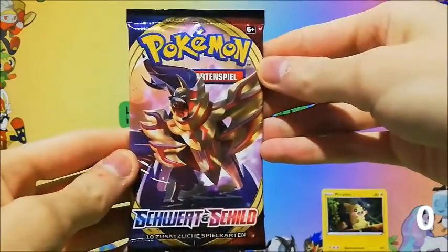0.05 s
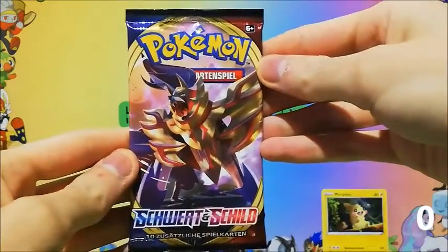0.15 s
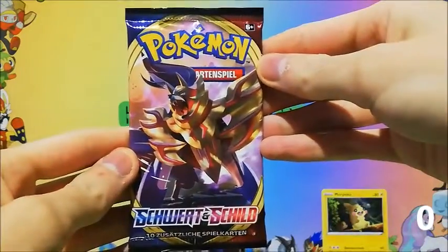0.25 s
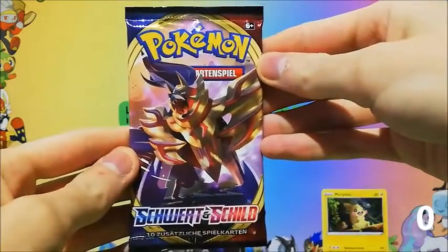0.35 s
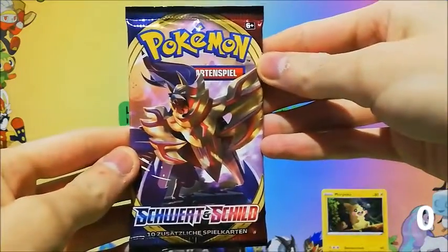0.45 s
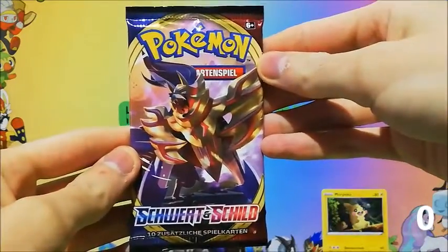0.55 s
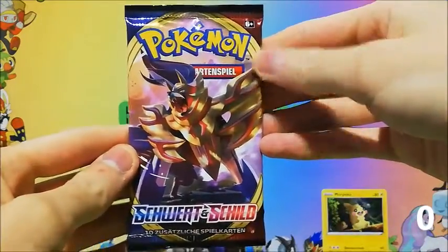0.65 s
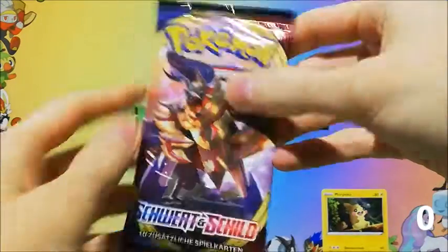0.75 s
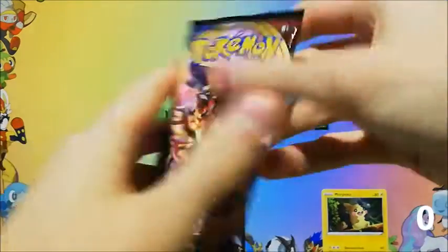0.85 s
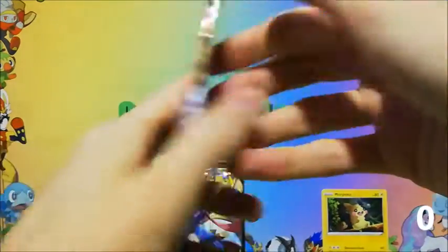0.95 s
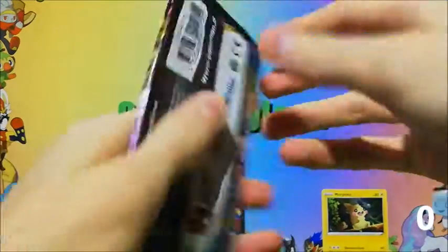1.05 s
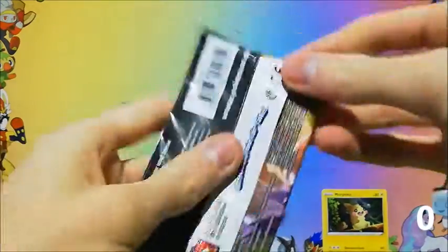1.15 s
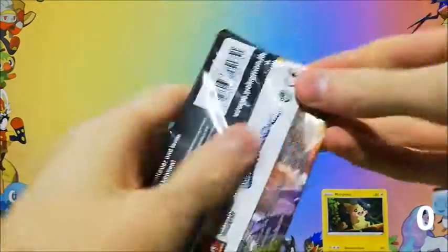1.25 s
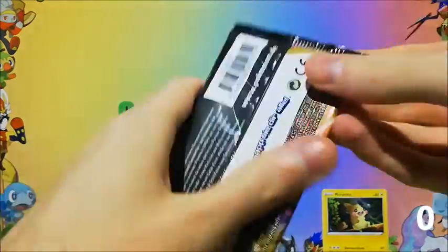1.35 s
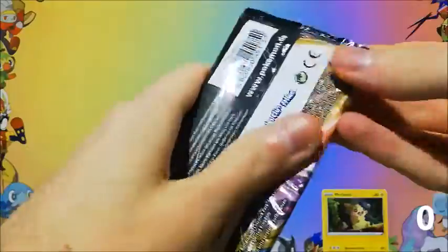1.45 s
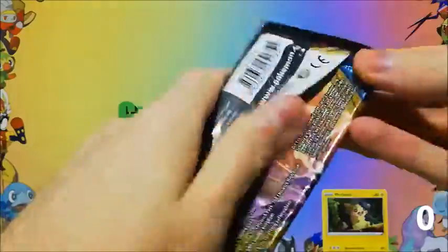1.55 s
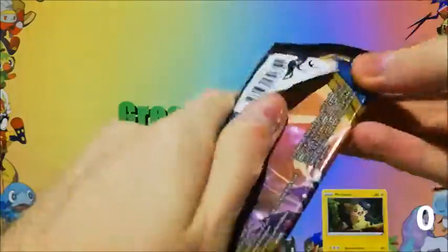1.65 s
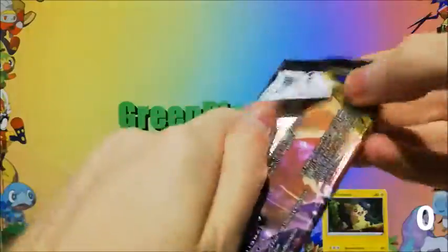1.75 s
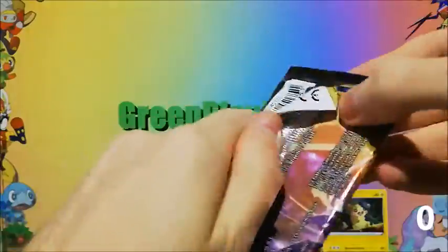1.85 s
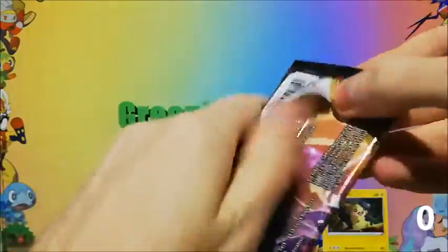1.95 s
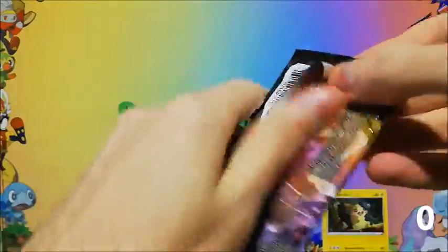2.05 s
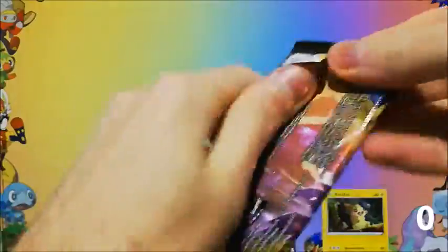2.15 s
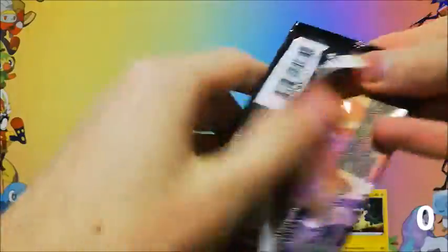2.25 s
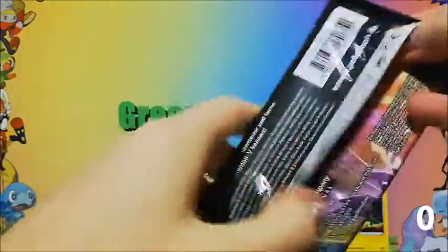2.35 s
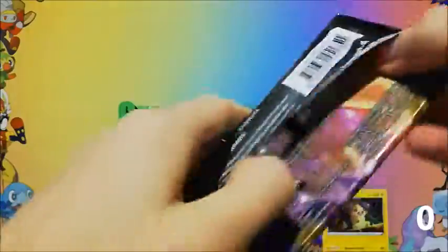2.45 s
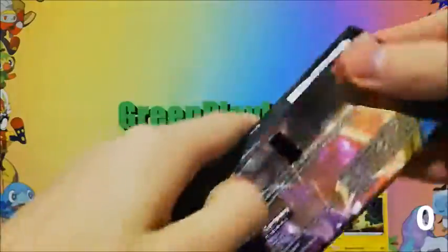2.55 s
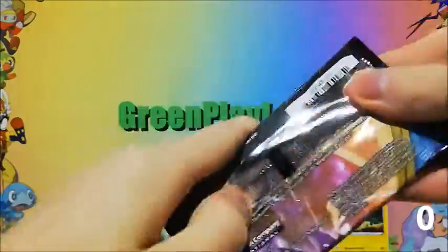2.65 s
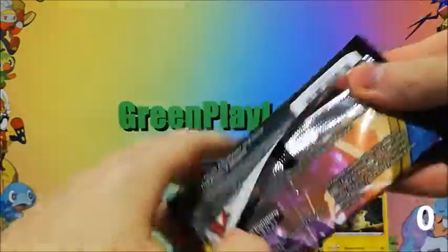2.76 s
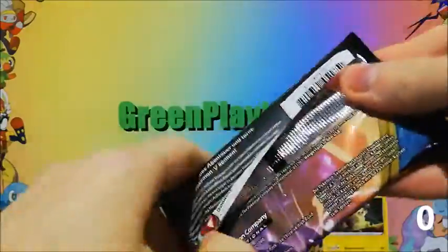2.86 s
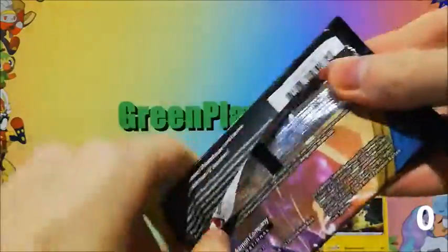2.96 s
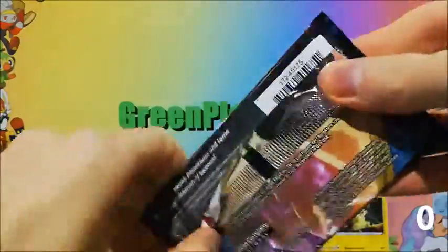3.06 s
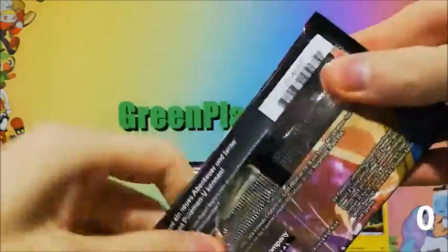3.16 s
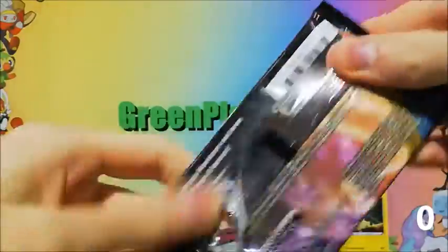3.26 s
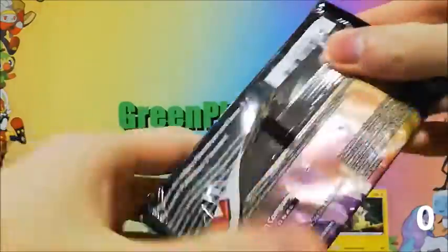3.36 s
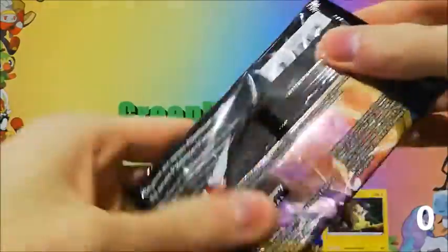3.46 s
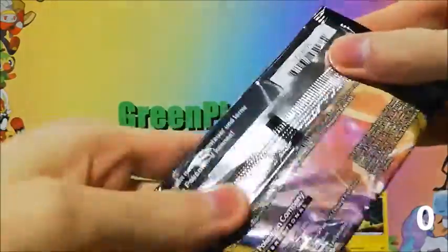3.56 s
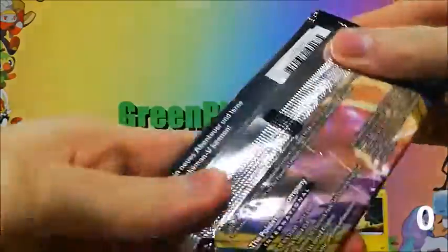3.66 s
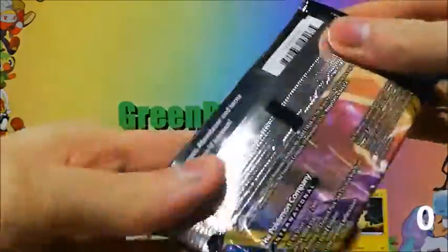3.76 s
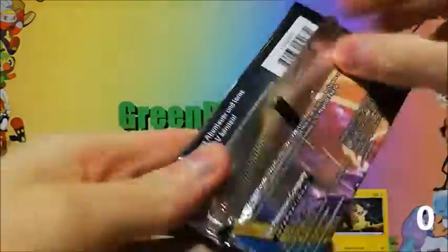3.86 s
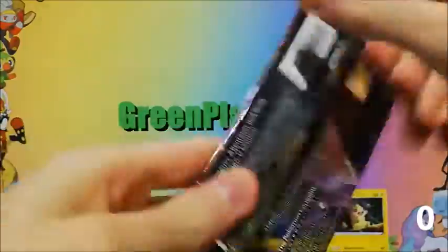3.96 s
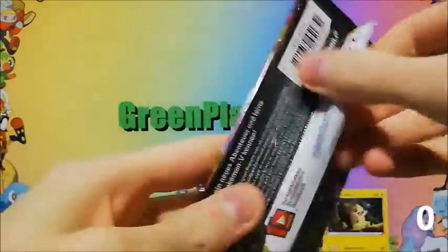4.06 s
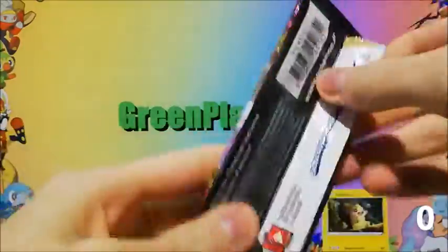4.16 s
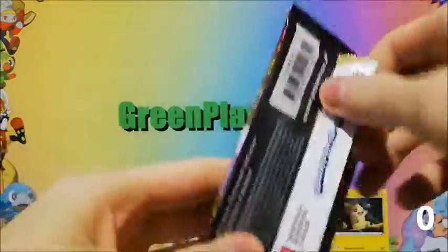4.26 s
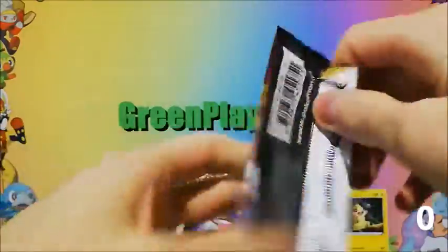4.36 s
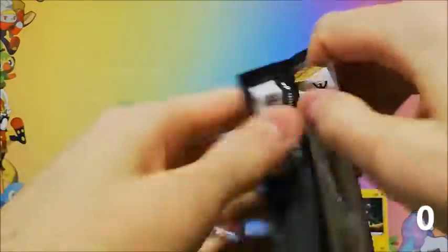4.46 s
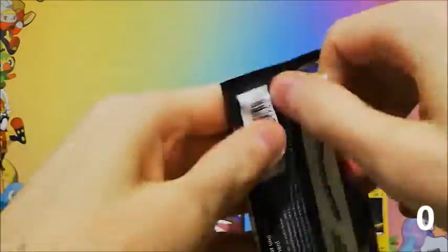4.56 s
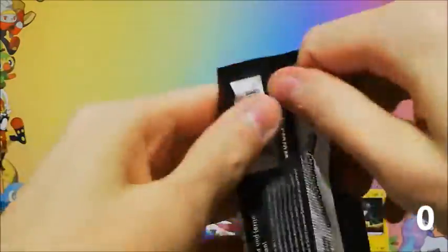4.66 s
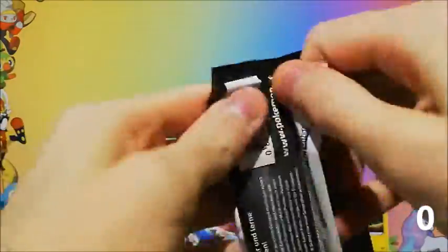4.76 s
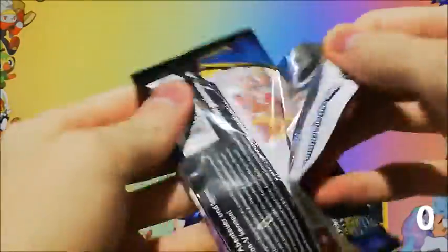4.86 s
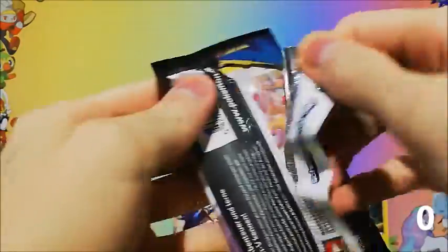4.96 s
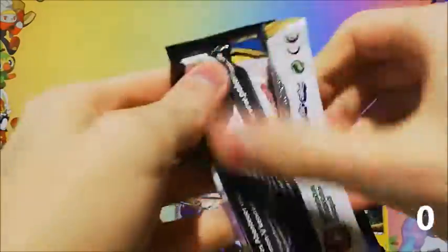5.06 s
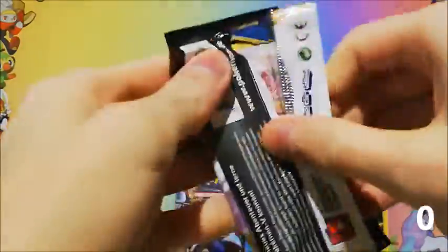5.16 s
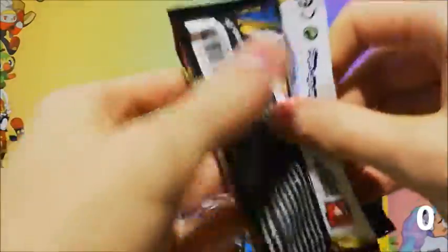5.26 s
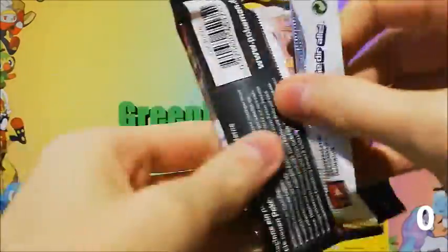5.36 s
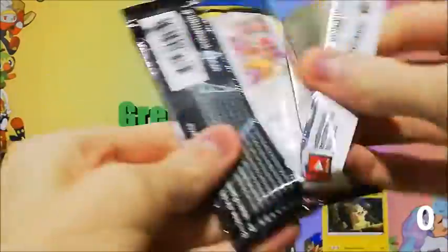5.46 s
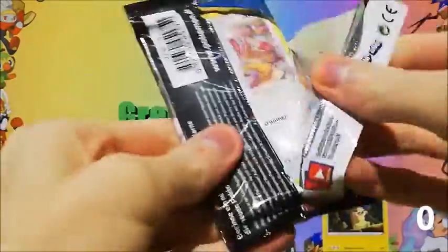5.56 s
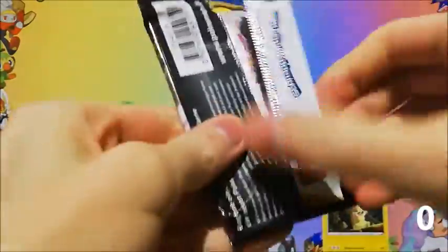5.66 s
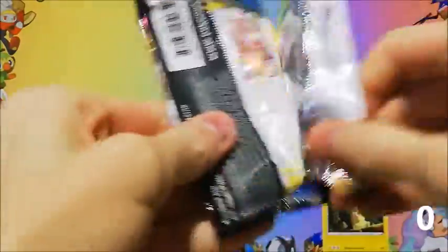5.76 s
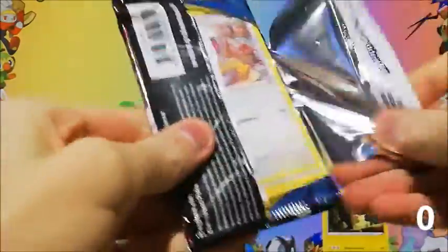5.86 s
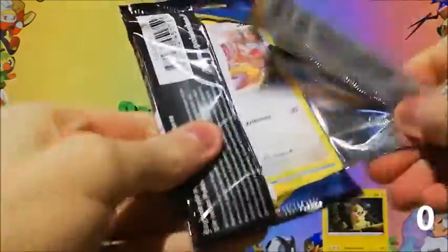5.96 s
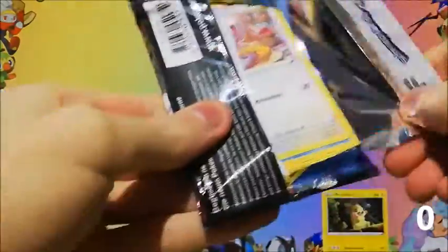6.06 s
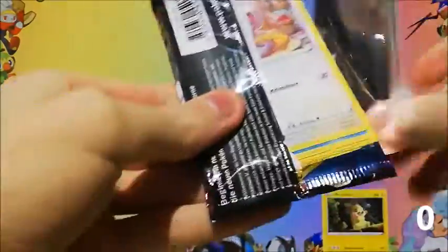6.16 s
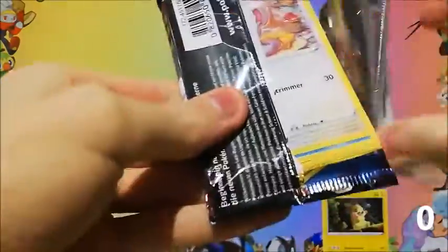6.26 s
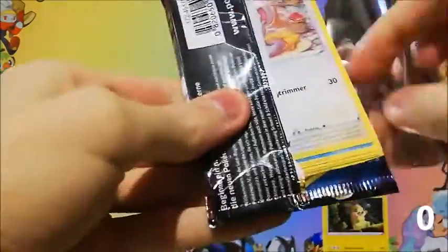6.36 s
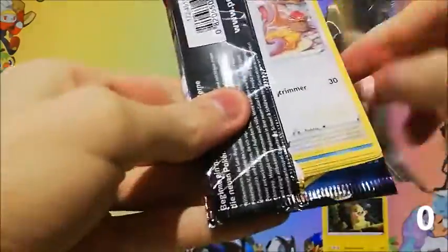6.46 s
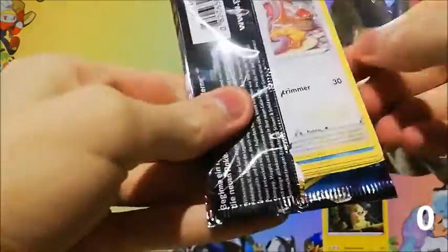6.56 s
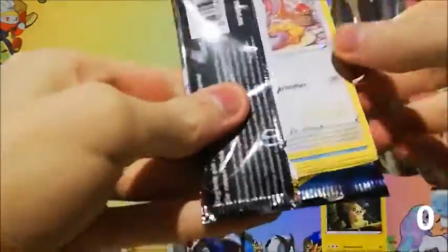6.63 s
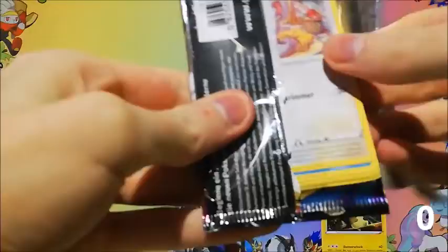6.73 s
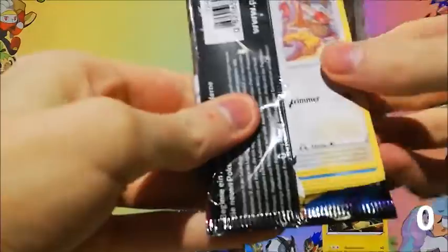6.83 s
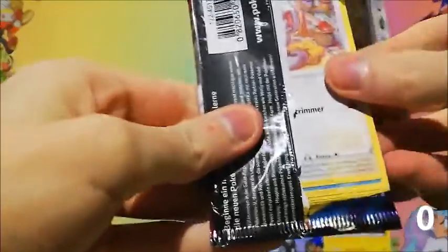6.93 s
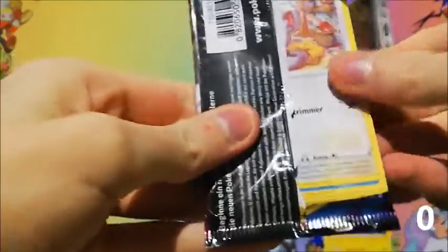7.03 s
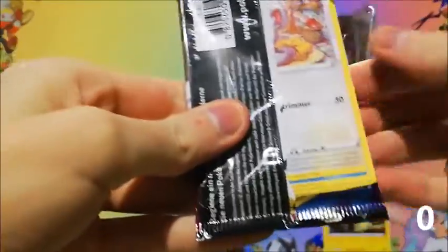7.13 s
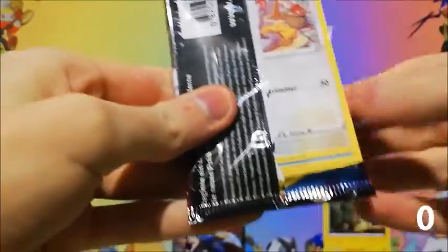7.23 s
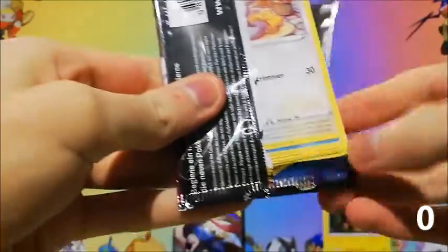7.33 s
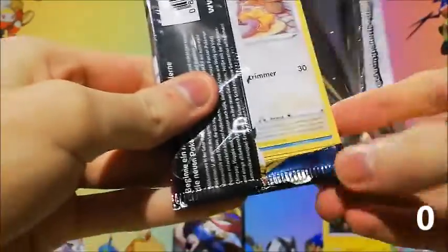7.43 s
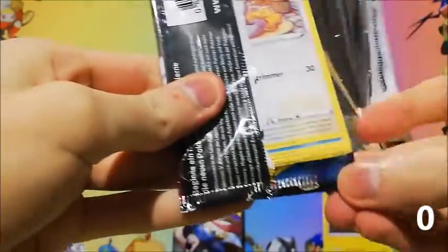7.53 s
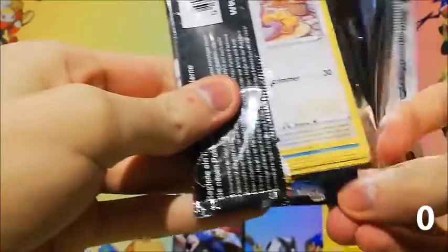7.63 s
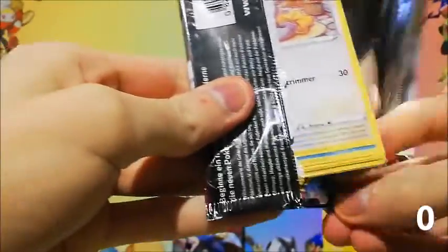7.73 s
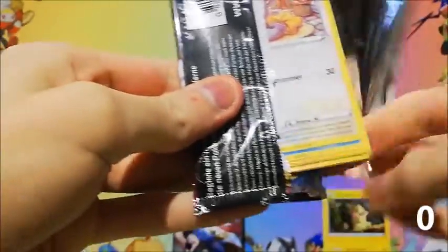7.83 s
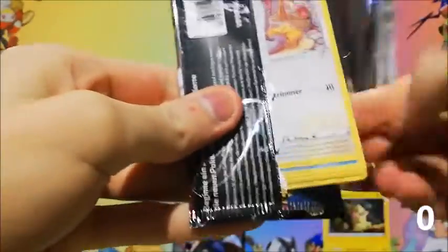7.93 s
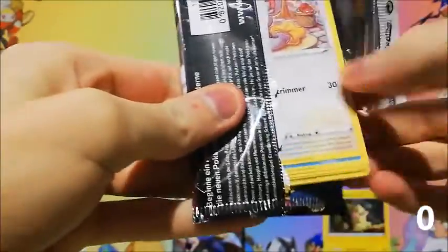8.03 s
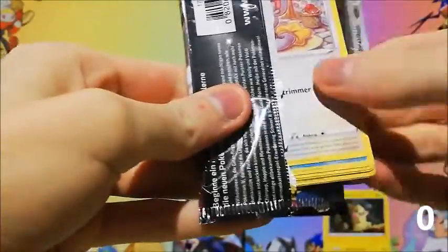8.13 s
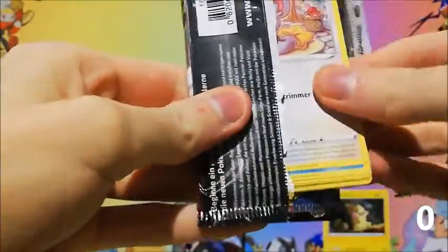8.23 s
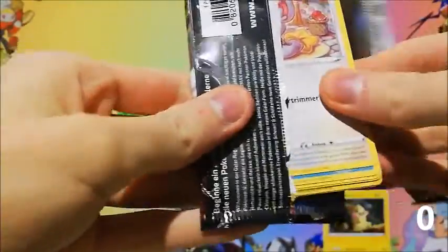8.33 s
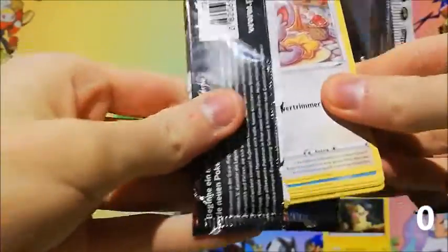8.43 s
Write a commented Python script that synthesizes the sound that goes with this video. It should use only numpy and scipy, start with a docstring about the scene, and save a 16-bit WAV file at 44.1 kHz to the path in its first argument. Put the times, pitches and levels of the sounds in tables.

```python
"""A foil trading-card wrapper is turned over, peeled open along its glued seam and folded back, close by.
Creases snap through and ring the stiff facets as short-lived modes; the seam lets go by stick-slip.
Squeezed foil crackles in many tiny pops and, where it slides instead of buckling, hisses softly.
Fingertips bump the stack of cards inside, a set of damped modes, and slide on it; one card ticks softly.
A small room adds brief echoes and a steady hush; two microphone ports colour the sound."""
import sys
import numpy as np
from scipy import signal
from scipy.fft import rfft, irfft, next_fast_len
from scipy.io import wavfile

SR = 44100
rng = np.random.default_rng(int(sys.argv[2]) if len(sys.argv) > 2 else 0)


def store_wav(level_fs):
    """Save 16-bit WAV to argv[1]."""
    pcm = np.round(np.clip(np.atleast_2d(level_fs), -1, 1) * 32767)
    wavfile.write(sys.argv[1], SR, pcm.T.astype(np.int16))


N = 374409
TIME = np.arange(N) / SR


def from_db(db):
    """Level to amplitude: 20 dB is a factor of ten."""
    return 10 ** (np.asarray(db) / 20)


def unit(x):
    """Energy normalisation: the mean energy of two channels becomes one."""
    return x / np.sqrt(np.sum(x ** 2) / 2 + 1e-20)


def at_hz(points, hz):
    """Spectral interpolation: straight lines on a log-frequency axis."""
    points = np.array(points)
    return np.interp(np.log(hz + 1e-9), np.log(points[:, 0]), points[:, 1])


def at_time(rows, s):
    """Linear interpolation in time of every column of a curve."""
    times, *columns = np.transpose(rows)
    return [np.interp(s, times, c) for c in columns]


def add(out, s, sound):
    """Superposition: mix a stereo sound in from time s on."""
    i = int(np.clip(s * SR, 0, N))
    out[:, i:i + sound.shape[1]] += sound[:, :N - i]


def noise(spectrum, likeness, size):
    """Partial coherence: shared and opposed noise make a stereo sound of rms one with a set likeness."""
    hz = np.fft.rfftfreq(size, 1 / SR)
    alike = np.clip(at_hz(likeness, hz), -1, 1)
    mid, side = rfft(rng.standard_normal((2, size))) * from_db(at_hz(spectrum, hz))
    stereo = np.sqrt(1 + alike) * mid + np.sqrt(1 - alike) * side * [[1], [-1]]
    return unit(irfft(stereo, size)) * np.sqrt(size)


def effort(t, length, attack_s, release_s):
    """Trapezoidal envelope, 0-1: a hand movement tightens, holds and lets go."""
    return np.clip(t / attack_s, 0, 1) * np.clip(1 - (t - length) / release_s, 0, 1)


# spectrum of the room's steady background: f/Hz, relative density/dB per Hz
HUSH_SPECTRUM = [(25, -4.5), (60, -11), (140, -8.5), (250, -13), (600, -23), (1300, -17.5), (2600, -22),
                 (10000, -25.5), (16000, -35)]
# left-right likeness of diffuse noise: f/Hz, likeness (0-1)
DIFFUSE_LIKENESS = [(100, 0.76), (1000, 0.24), (6000, 0.055)]
HUSH_DB = -65


def hush():
    """Stationary noise: the room's background has a fixed spectrum and level."""
    return from_db(HUSH_DB) * noise(HUSH_SPECTRUM, DIFFUSE_LIKENESS, size=next_fast_len(N))[:, :N]


# strength of the room's echo: f/Hz, level/dB
ECHO_SPECTRUM = [(100, -16), (450, 0), (1500, -5.5), (4000, -9.5), (10000, -11.5), (16000, -10.5)]
ROOM_T60_S = 0.32


def room(x, first_s=0.00087, build_s=0.0051):
    """Reverberation: echoes from desk and walls thicken within milliseconds and decay exponentially."""
    t = TIME[:SR // 2]
    build_up = np.clip((t - first_s) / build_s, 0, 1)
    tail = unit(rng.standard_normal((2, len(t))) * from_db(-60 * t / ROOM_T60_S) * build_up)
    colour = from_db(at_hz(ECHO_SPECTRUM, np.fft.rfftfreq(len(t), 1 / SR)))
    tail = irfft(rfft(tail) * colour, len(t))
    return x + signal.oaconvolve(x, tail, axes=1)[:, :N]


# resonances and dips of the two microphone ports: f/Hz, width/Hz, left level/dB, right level/dB
PORT_RESONANCES = [(1960, 330, -2, 2), (4100, 3000, -1.5, 2), (5830, 330, -1.5, -0.5),
                   (10020, 1980, 6, 5.5), (11900, 3500, -.5, 4)]


def ports(x):
    """Cavity resonance: small microphone openings colour each side a little differently."""
    left, right = x
    for hz, width_hz, left_db, right_db in PORT_RESONANCES:
        b, a = signal.iirpeak(hz, hz / width_hz, fs=SR)
        left = left + (from_db(left_db) - 1) * signal.lfilter(b, a, left)
        right = right + (from_db(right_db) - 1) * signal.lfilter(b, a, right)
    return np.array([left, right])


# the pack moves from the left towards the middle: t/s, left minus right level/dB, right ear's delay/ms
PACK_POSITION = [(5.7, 1.5, .1), (6.1, 1.3, .035)]


def placed(x):
    """Interaural differences: a sound to the left reaches the right ear later and weaker."""
    left_db, delay_ms = at_time(PACK_POSITION, TIME)
    delay = np.round(delay_ms * SR / 1000).astype(int)  # whole samples
    earlier = np.clip(np.arange(N) - delay, 0, N - 1)
    return np.array([x[0] * from_db(left_db / 2), x[1, earlier] * from_db(-left_db / 2)])


# fingertips bumping the cards: t/s, relative knock level/dB, relative thud level/dB
CARD_BUMPS = [(.848, -51, -62), (1.409, -48.5, -77), (2.385, -47.5, -74), (3.37, -47, -74),
              (4.086, -54, -50), (4.18, -54.5, -68), (5.098, -48.5, -54.5), (5.936, -46, -52),
              (5.993, -42.5, -62), (6.088, -48, -64), (6.128, -51.5, -68), (6.307, -48.5, -58),
              (6.487, -50.5, -62), (6.62, -51.5, -53.5), (6.898, -57, -77), (7.222, -52.5, -68),
              (7.881, -41, -60), (8.134, -54, -74)]
# modes of the stack of cards in the hand: median f/Hz, relative level/dB, t60/s
STACK_MODES = [(160, -3.5, 0.046), (229, -1, 0.046), (301.5, 1, 0.041), (400, -2.5, 0.041),
               (605, -5.5, 0.027)]


def bumps(knock_db=9.5, thud_db=10.5, thud_hz=75, thud_t60=0.073):
    """Modal excitation: a bump rings the stack of cards and shakes the hand with a thud."""
    out, t = np.zeros((2, N)), TIME[:SR // 5]
    soft_contact = 1 - np.exp(-t / .003)
    for s, knock, thud in CARD_BUMPS:
        bump = from_db(thud + thud_db - 60 * t / thud_t60) * np.sin(2 * np.pi * thud_hz * t)
        for hz, level, t60 in STACK_MODES:
            # the grip changes, so the modes shift from bump to bump
            held_hz = hz * np.exp(.08 * rng.standard_normal())
            fading = from_db(knock + knock_db + level - 60 * t / t60)
            bump += fading * np.sin(2 * np.pi * (held_hz * t + rng.random()))
        add(out, s, np.array([bump, bump]) * soft_contact)
    return out


# a fingertip sliding on the pack: middle t/s, half length to 1/e /s,
# relative scrape level/dB, relative low rub level/dB
FINGER_SLIDES = [(0.897, .05, -57, -65.5), (6.253, .09, -59, -53.5), (6.806, 0.025, -41, -70),
                 (7.936, 0.048, -54, -59.5)]
# a fingertip scraping on card: f/Hz, relative density/dB per Hz
SCRAPE_SPECTRUM = [(400, -19), (700, -10.5), (1250, -1), (2000, -11), (5000, -22), (10000, -14),
                   (16000, -45)]
# the low rub of a sliding fingertip: f/Hz, relative density/dB per Hz
RUB_SPECTRUM = [(80, -22), (170, -1), (290, 0), (400, -13), (1500, -30), (4000, -55)]
# left-right likeness of both: f/Hz, likeness (0-1)
SLIDE_LIKENESS = [(200, 1), (5000, 0.5)]


def slides():
    """Friction noise: skin catches and lets go, so a rubbing, scraping slide comes in lumps."""
    out, size = np.zeros((2, N)), next_fast_len(N)
    scrape = noise(SCRAPE_SPECTRUM, SLIDE_LIKENESS, size=size)[:, :N]
    rub = noise(RUB_SPECTRUM, SLIDE_LIKENESS, size=size)[:, :N]
    catches = np.arange(0, TIME[-1], .014)
    judder = from_db(np.interp(TIME, catches, 6 * rng.standard_normal(len(catches))) - 3)
    for s, half, scrape_db, rub_db in FINGER_SLIDES:
        stroke = judder * np.exp(-((TIME - s) / half) ** 2)
        out += stroke * (from_db(scrape_db) * scrape + from_db(rub_db) * rub)
    return out


# the wrapper forms a hollow pocket around the cards: t/s, relative level of the hollow/dB
HOLLOW_LEVEL = [(1.0, 0.5), (2.5, -31.5), (4.1, -1), (4.9, -3.5), (5.8, 9), (6.5, 11), (8.3, 10)]


def cards(foil, jolt_db=-22.5, loosening=0.27):
    """Forced response: jerks of the foil tug a dull tock from the cards, freer as the hollow opens."""
    stack = signal.butter(2, [230, 600], "band", fs=SR, output="sos")
    freedom = from_db(jolt_db + loosening * at_time(HOLLOW_LEVEL, TIME)[0])
    return freedom * signal.sosfilt(stack, np.abs(foil).mean(axis=0))


def pocket(foil, pocket_hz=930, width_hz=380, pocket_db=5.0):
    """Air resonance: the air between foil and cards gives the foil's sound a hollow note."""
    b, a = signal.iirpeak(pocket_hz, pocket_hz / width_hz, fs=SR)
    return from_db(at_time(HOLLOW_LEVEL, TIME)[0] + pocket_db) * signal.lfilter(b, a, foil.mean(axis=0))


RING = 256  # samples that one facet rings
# so light a sheet radiates little bass
LIGHT_SHEET = signal.butter(3, 1100, "high", fs=SR)


def facet(spectrum, t60, apart, left_db, count, colour_db=5.0):
    """Modal superposition: a buckling patch rings in its own modes, of different strength in each ear."""
    t = np.arange(RING) / SR
    place = (np.arange(count) + rng.random(count)) / count
    hz = spectrum[0][0] + (spectrum[-1][0] - spectrum[0][0]) * place
    life = t60 * from_db(3 * rng.standard_normal())
    # a quick decay over a weaker, slower one, with a soft onset
    fading = (from_db(-60 * t / life) + .16 * (1 - t / t[-1]) ** 2) * (1 - np.exp(-t / .00012))
    modes = fading * np.sin(2 * np.pi * (hz[:, None] * t + rng.random((count, 1))))
    # the shape of the patch favours one or two groups of modes
    shape_db = colour_db * np.cos(2 * np.pi * (rng.uniform(1, 2.06) * place + rng.random()))
    strength = rng.standard_normal(count) + apart * rng.standard_normal((2, count))
    strength = strength * from_db(at_hz(spectrum, hz) + shape_db)
    side_db = (left_db + 1.6 * rng.standard_normal()) * np.array([[1], [-1]])
    return unit(signal.lfilter(*LIGHT_SHEET, strength @ modes) * from_db(side_db))


# treble ringing of the foil facets: f/Hz, relative level/dB
TREBLE_SPECTRUM = [(5500, -2), (8000, 0.5), (10500, 0.5), (12500, -9), (16000, -15.5)]


def small_facet():
    """High modes of a small taut patch: a bright tick, usually stronger on the left."""
    return facet(TREBLE_SPECTRUM, t60=.003, apart=1.0, left_db=2.4, count=48)


# lower ringing of the foil facets: f/Hz, relative level/dB
BODY_SPECTRUM = [(800, 4.5), (1000, -18), (1600, 1), (2400, -8), (3300, 4), (5500, 7.5)]


def large_facet():
    """Low modes of a wide patch: the lower body of a crack, more alike in both ears."""
    return facet(BODY_SPECTRUM, t60=.005, apart=.5, left_db=0, count=32)


# the fingers squeeze and fold the foil: start t/s, length/s, relative treble level/dB,
# body level relative to the treble/dB
FOIL_SQUEEZES = [(0.81, 0.18, -46.5, -5.5), (1.053, 0.23, -39, -2.5), (1.162, 0.086, -30, -6.5),
                 (1.322, 0.16, -45, -1), (1.499, 0.11, -39, -4.5), (1.895, 0.16, -35.5, -2),
                 (2.27, 0.11, -31, -5), (2.416, 0.029, -29.5, -1.5), (2.533, 0.099, -30.5, -6),
                 (2.793, 0.068, -35, -0.5), (2.885, 0.21, -33.5, -11), (3.113, 0.17, -35.5, -10),
                 (3.328, 0.046, -33, -10), (3.487, 0.062, -32, -6), (3.568, 0.11, -29, -9),
                 (3.675, 0.11, -41.5, -10.5), (3.826, 0.19, -36.5, -8), (4.085, 0.11, -40, -10),
                 (4.284, 0.16, -53, 1), (4.357, 0.26, -41, -4), (4.66, 0.17, -39, -6),
                 (4.931, 0.072, -33.5, -5), (5.046, 0.056, -34, -3.5), (5.176, 0.15, -38, -8),
                 (5.348, 0.055, -43.5, -1.5), (5.541, 0.086, -35, -2), (5.677, 0.056, -39, -4),
                 (5.78, 0.24, -36, -4), (6.134, 0.054, -41.5, -9.5), (6.241, 0.07, -40, -4.5),
                 (6.457, 0.044, -45, -10), (6.551, 0.091, -51.5, -3), (6.75, 0.13, -51.5, -8),
                 (7.113, 0.13, -56, 0.5), (7.167, 0.041, -41.5, -6), (7.332, 0.19, -49, -7.5),
                 (7.642, 0.055, -46, -9), (7.834, 0.19, -46, -7.5), (8.088, 0.11, -51, -9),
                 (8.348, 0.14, -48.5, -16)]
SQUEEZE_ATTACK_S, SQUEEZE_RELEASE_S = .015, .027
# from the first touch on, a faint steady stir underlies the squeezes
FIRST_TOUCH_S, STIR_DB = .76, -66.5
# a light squeeze mostly slides; above this level it mostly buckles the foil
BUCKLE_DB = -53.5


def squeezing(t):
    """Driving force: the strongest grip sets the strength of the foil's treble and body at times t."""
    start, length, level, body = np.transpose(FOIL_SQUEEZES)
    grip = effort(t[:, None] - start, length, SQUEEZE_ATTACK_S, SQUEEZE_RELEASE_S)
    stir = from_db(STIR_DB) * (t > FIRST_TOUCH_S)
    treble_grip = (grip * from_db(level)).max(axis=1)
    body_grip = (grip * from_db(level + body)).max(axis=1)
    return treble_grip + stir, body_grip + stir


def rustle(treble_db=-6.5, body_db=-7.5, grain_db=3.5):
    """Sliding friction: foil that does not buckle slides over foil and skin with a soft, grainy hiss."""
    t, size = TIME[::SR // 300], next_fast_len(N)
    treble, body = squeezing(t)
    sliding = from_db(grain_db * rng.standard_normal(len(t))) / np.hypot(1, treble / from_db(BUCKLE_DB))
    layers = [(TREBLE_SPECTRUM, treble * from_db(treble_db)), (BODY_SPECTRUM, body * from_db(body_db))]
    out = 0
    for spectrum, strength in layers:
        edges_hz = [max(spectrum[0][0], 1100), spectrum[-1][0]]
        band = signal.butter(3, edges_hz, "band", fs=SR, output="sos")
        hiss = signal.sosfilt(band, noise(spectrum, DIFFUSE_LIKENESS, size=size)[:, :N])
        out = out + np.interp(TIME, t, sliding * strength) * unit(hiss) * np.sqrt(N)
    return out


def crackle(per_s=300, scatter_db=6.5, clump_db=4.0, treble_db=-5.5, body_db=-3.5, count=120):
    """Random pulse train: tiny wrinkles pop, mostly weak and a few strong, as hard as the squeeze."""
    out = np.zeros((2, N))
    small = [small_facet() for _ in range(count)]
    large = [large_facet() for _ in range(count)]
    chance = rng.random(N)
    size_db = scatter_db * np.minimum(rng.standard_normal(N), 2)
    dealt = rng.integers(0, count, (2, N))  # which facets ring
    # neighbouring pops swell and fade together
    clumps = TIME[::SR // 45]
    swell = np.minimum(rng.standard_normal(len(clumps)), 1)
    size_db = size_db + clump_db * np.interp(TIME, clumps, swell)
    born = np.flatnonzero(chance < per_s / SR)
    for i, treble, body in zip(born, *squeezing(TIME[born])):
        buckling = treble / np.hypot(treble, from_db(BUCKLE_DB))
        pop = treble * from_db(treble_db) * small[dealt[0, i]]
        pop = pop + body * from_db(body_db) * large[dealt[1, i]]
        add(out, TIME[i], buckling * pop * from_db(size_db[i]) * np.sqrt(SR / per_s))
    return out


# pulls on the glued seam: start t/s, length/s, nominal slip rate/Hz, unevenness (0-1),
# relative treble level/dB, relative body level re treble/dB
SEAM_PULLS = [(1.616, .08, 384, .6, -23.5, -3), (1.701, 0.17, 492, 0.48, -23.5, -6),
              (2.129, 0.057, 440, 0.48, -22.5, -3.5), (2.19, 0.062, 480, .14, -21.5, -4.5),
              (2.626, .103, 1400, .2, -20, -13), (4.859, 0.066, 1160, 0.44, -21.5, -6),
              (5.483, 0.051, 650, 0.27, -23, -8)]
PULL_ATTACK_S, PULL_RELEASE_S = .022, .02
PULL_SLOWING = .3  # share of the slip rate lost as the pull slackens


def peeling(treble_db=-4.0, body_db=-1.5, scatter_db=1.5):
    """Stick-slip: an even pull on the glue buzzes, an uneven one rips; the edge keeps meeting new facets."""
    out = np.zeros((2, N))
    for start, length, per_s, uneven, level, body in SEAM_PULLS:
        t, small, large = 0, small_facet(), large_facet()
        fresh = np.clip(.3 + .7 * uneven, 0, 1)  # share of new facet in each slip
        while t < length + PULL_RELEASE_S:
            pull = effort(t, length, PULL_ATTACK_S, PULL_RELEASE_S)
            small = unit((1 - fresh) * small + fresh * small_facet())
            large = unit((1 - fresh) * large + fresh * large_facet())
            slip = from_db(treble_db) * small + from_db(body + body_db) * large
            strength = from_db(level + scatter_db * uneven * rng.standard_normal())
            add(out, start + t, pull * slip * np.sqrt(SR / per_s) * strength)
            rate = max(per_s * (1 - PULL_SLOWING * (1 - pull)), 20)
            t += np.exp(uneven * rng.standard_normal()) / rate
    return out


# creases snapping through, and one soft tick of a card at 7.08 s:
# t/s, relative treble level/dB, relative body level re treble/dB
SNAPS_AND_TICK = [(0.854, -33.5, -5), (1.0395, -30.5, -6), (1.0924, -19, -15), (1.1669, -20, -6),
                  (1.2059, -17, -4), (1.2622, -18.5, -34), (1.3108, -32.5, 1.5), (1.4068, -20.5, -9.5),
                  (1.5349, -22.5, -6), (1.5556, -19.5, -18), (1.8703, -14, -12.5), (1.955, -20.5, -10),
                  (2.04, -22.5, -1.5), (2.0601, -20, -9), (2.3185, -22.5, -3.5), (2.4521, -21, 0),
                  (2.5428, -23, -9), (2.7878, -20, -8.5), (2.9025, -19.5, -6.5), (3.0224, -19.5, -12.5),
                  (3.0576, -19, -27), (3.1187, -22, -25), (3.2458, -20.5, -14), (3.3746, -20.5, -8.5),
                  (3.4966, -24, -3.5), (3.7283, -22.5, -11), (3.9121, -21.5, -5), (4.0047, -25.5, 1.5),
                  (4.0902, -27, 0.5), (4.1085, -20, -6.5), (4.1826, -25.5, -1.5), (4.382, -19, -9.5),
                  (4.4977, -22, -11), (4.5904, -26.5, -5), (4.6022, -20.5, -10.5), (4.672, -23, -3.5),
                  (4.7631, -19, -15), (4.7806, -18.5, -6), (4.8304, -25.5, -6.5), (4.874, -13.5, -7.5),
                  (5.1845, -27, -5), (5.3056, -21.5, -8), (5.4727, -23, -2.5), (5.5006, -19, -24.5),
                  (5.6858, -23.5, -7.5), (5.732, -21.5, -28), (5.8099, -19.5, -17), (5.8456, -17, -10.5),
                  (5.8908, -21.5, -4), (5.937, -17, -5.5), (5.9923, -20, -10.5), (6.155, -31.5, -2),
                  (6.225, -19, -16), (6.2442, -26.5, -5.5), (6.3671, -35, -6.5), (6.4911, -41.5, 3.5),
                  (6.8545, -32.5, -6), (6.9, -42.5, 1), (7.0777, -69, 19), (7.2063, -18.5, -9.5),
                  (7.4056, -25, -10), (7.4161, -22.5, -14.5), (7.4798, -33, -10.5), (7.6744, -24.5, -21),
                  (7.7174, -27, -23), (7.8199, -31, -4.5), (7.8518, -23.5, -11), (7.8871, -24, -6),
                  (8.1361, -21.5, -6), (8.2723, -26.5, -14.5), (8.4581, -27.5, -18)]


def snaps_and_tick(treble_db=-2.0, body_db=1.0, neighbour_db=-9.5, neighbour_s=0.0017, count=3):
    """Snap-through buckling: creases ring fresh facets amid neighbouring slips; a card's tick is made alike."""
    out = np.zeros((2, N))
    window = np.sqrt(.003 * SR)  # spreads a facet's unit energy over 3 ms
    for s, level, body in SNAPS_AND_TICK:
        slips = [(0, .0047)]  # the main event: delay/s, level/dB
        for _ in range(count):
            slips.append((neighbour_s * rng.normal(0, 1), rng.normal(neighbour_db, 2)))
        for delay, slip_db in slips:
            crack = from_db(treble_db) * small_facet() + from_db(body + body_db) * large_facet()
            add(out, s + delay, window * from_db(level + slip_db) * crack)
    return out


def scene():
    """Superposition: foil, cards and fingers sound close by, over the hush of the room."""
    foil = snaps_and_tick() + crackle() + peeling() + rustle()
    pack = placed(foil + pocket(foil) + cards(foil) + bumps() + slides())
    return ports(room(pack)) + hush()


def record(dry):
    """Band limiting: peaks beyond full scale are clipped, then the top above 16 kHz is cut."""
    top_cut = signal.ellip(10, .2, 70, 16000, fs=SR, output="sos")
    return signal.sosfilt(top_cut, np.clip(dry, -1, 1))


dry = scene()
out = record(dry)
store_wav(out)
```